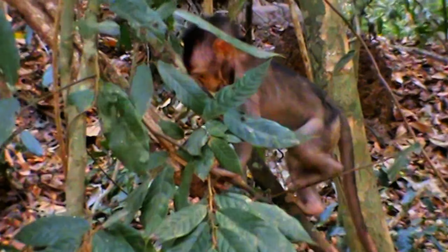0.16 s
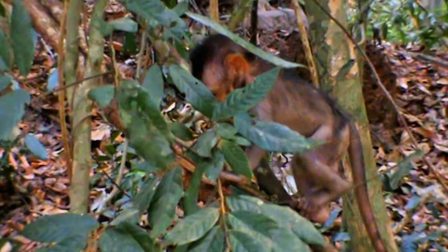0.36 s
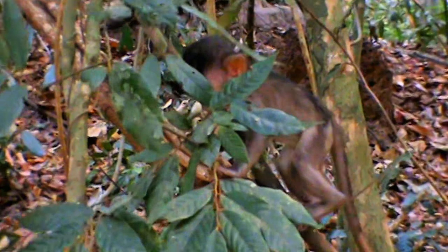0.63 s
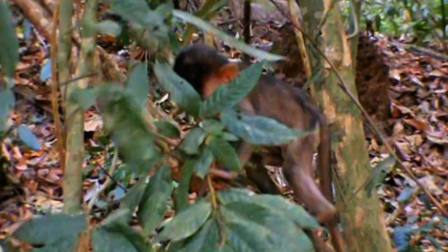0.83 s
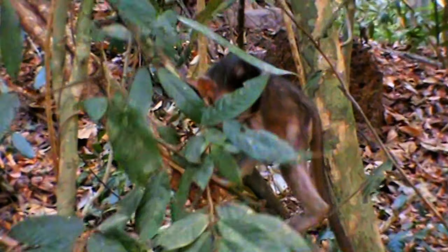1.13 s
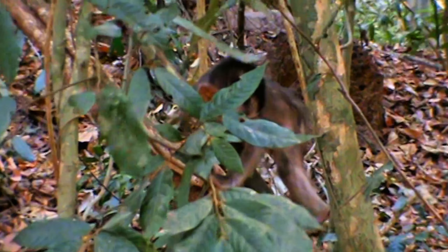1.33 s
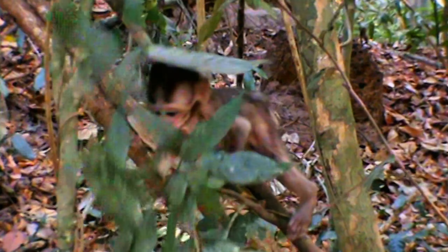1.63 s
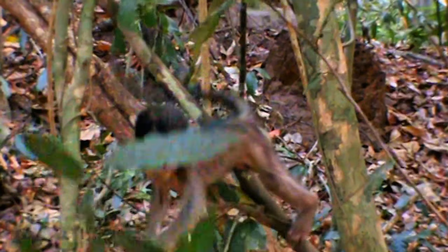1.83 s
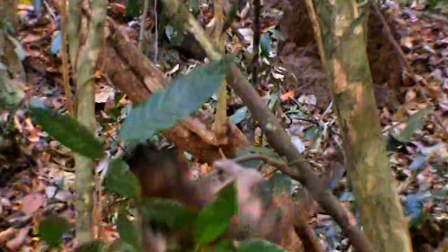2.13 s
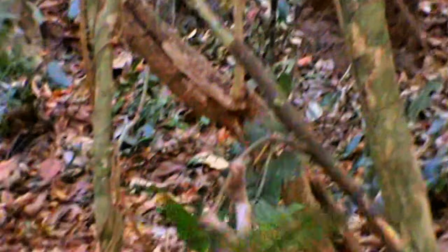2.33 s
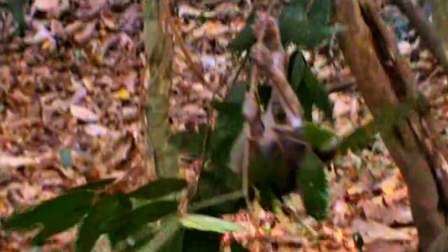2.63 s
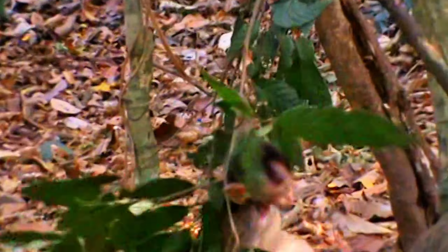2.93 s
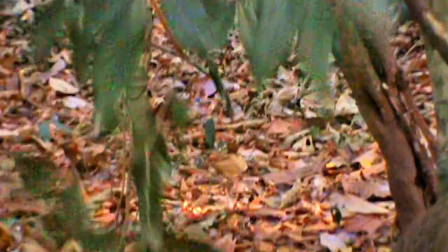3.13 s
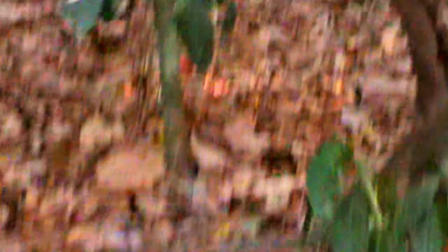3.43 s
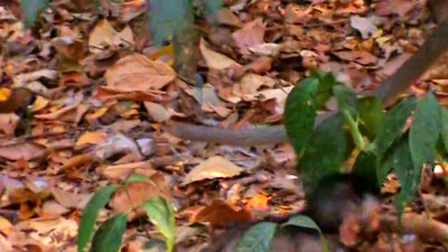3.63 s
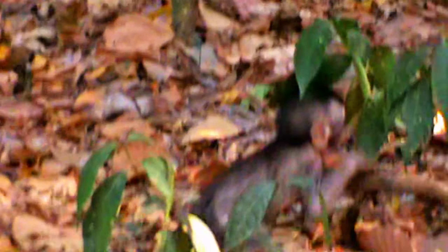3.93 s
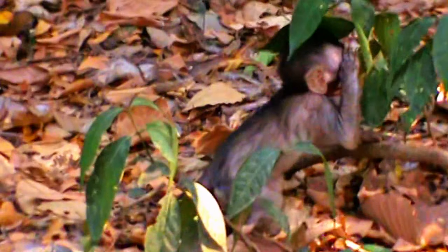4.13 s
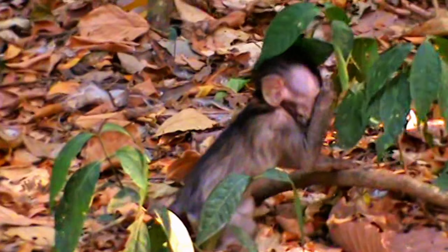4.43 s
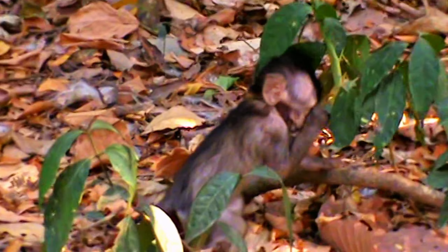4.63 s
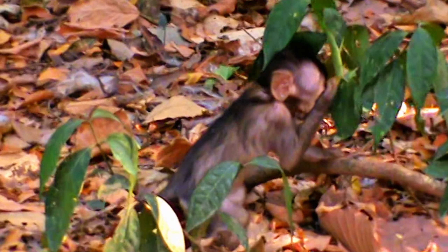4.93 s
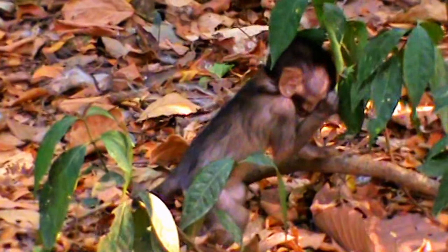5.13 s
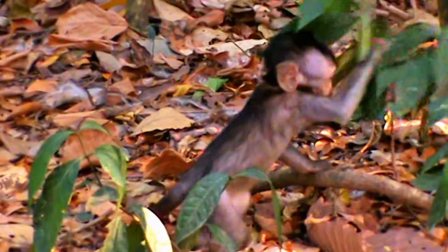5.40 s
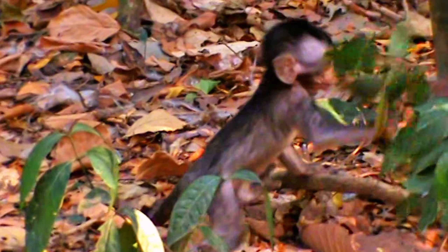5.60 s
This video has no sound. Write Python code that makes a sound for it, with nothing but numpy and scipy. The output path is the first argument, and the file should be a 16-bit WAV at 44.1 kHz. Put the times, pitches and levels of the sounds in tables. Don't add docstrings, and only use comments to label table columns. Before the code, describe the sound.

A dense, shrill cicada drone fills a tropical forest while nearer cicadas pulse rapidly and a small animal faintly bumps twigs.

```python
import sys
import numpy as np
from scipy import signal
from scipy.fft import rfft, irfft
from scipy.io import wavfile
from scipy.ndimage import uniform_filter1d, minimum_filter1d, map_coordinates

SR = 44100
rng = np.random.default_rng(int(sys.argv[2]) if len(sys.argv) > 2 else 0)


def store_pcm(level_fs):
    pcm = np.round(np.clip(level_fs, -1, 1) * 32767).astype(np.int16)
    wavfile.write(sys.argv[1], SR, np.atleast_2d(pcm).T)


def volts_from_decibels(level):
    exponent = np.asarray(level, float) / 20
    return 10 ** exponent


N = 254016
T = np.arange(N) / SR
HZ = np.maximum(np.fft.rfftfreq(N, 1 / SR), 1)


def rms_one(x):
    return x / np.sqrt(np.mean(x ** 2) + 1e-20)


def at_time(points, when):
    return np.interp(when, *np.transpose(points))


def at_hz(points):
    hz, value = np.transpose(points)
    return np.interp(np.log(HZ), np.log(np.maximum(hz, 1)), value)


def rings(modes):
    power = 0
    for hz, width, db in modes:
        distance = 2 * (HZ - hz) / width
        power = power + volts_from_decibels(db) ** 2 / (1 + distance ** 2) ** 2
    return power


def coloured(x, power):
    return rms_one(irfft(rfft(x) * np.sqrt(power), N))


def clicks(per_s, spread_db):
    sizes = volts_from_decibels(spread_db * np.minimum(rng.exponential(1, (2, N)), 4))
    signs = rng.choice([-1, 1], (2, N))
    return sizes * signs * (rng.random((2, N)) < per_s / SR)


def flicker(rate_hz):
    return coloured(rng.standard_normal(N), 1 / (1 + (HZ / rate_hz) ** 2) ** 2)


def heard(streams, power):
    # (f/Hz, likeness 0 to 1)
    likeness = [(30, .985), (99, 0.97), (160, 0.86), (270, 0.34), (450, 0.026), (740, 0.079), (1220, 0.93),
                (3330, 0.88), (6400, 0.9), (9000, 0.96), (10800, 0.62), (12700, 0.54), (14900, .72),
                (15400, .99)]
    # (f/Hz, phase/rad)
    lead = [(0, 0.41), (3620, -0.38), (4220, 0.011), (10100, -0.016), (10900, -0.3), (12400, 2),
            (13400, 1.2), (14600, 0.057), (16500, -0.1)]
    # (f/Hz, level/dB)
    tilt = [(100, -0.5), (300, -1), (3000, -0.3), (9500, -0.6), (11000, 0), (13000, 4), (15000, -2)]
    shared, differing = rfft(streams) * np.sqrt(power)
    alike = np.clip(at_hz(likeness), 0, .999)
    turn = volts_from_decibels(at_hz(tilt) / 2) * np.exp(.5j * at_hz(lead))
    mid = np.sqrt(1 + alike) * shared
    side = np.sqrt(1 - alike) * differing
    return rms_one(irfft([(mid + side) * turn, (mid - side) / turn], N))


def low_rumble():
    # (f/Hz, level per Hz/dB)
    floor_tone = [(15, -37), (25, -11), (50, -1.5), (100, -1), (200, -0.5), (260, 0.5), (350, -4.5),
                  (480, -2.5), (650, -4), (900, -4.5), (1150, -17), (1500, -28), (2300, -80)]
    floor_db = -59
    return volts_from_decibels(floor_db) * heard(rng.standard_normal((2, N)), volts_from_decibels(at_hz(floor_tone)) ** 2)


def motor_hum():
    # (f/Hz, width/Hz, level/dB)
    hum_pitches = [(101, 13, -69.5), (187, 14, -79), (244, 25, -77)]
    hum = np.zeros((2, N))
    for hz, width, db in hum_pitches:
        hum += volts_from_decibels(db) * heard(rng.standard_normal((2, N)), rings([(hz, width, 0)]))
    return hum


def twig_bumps():
    # (t/s, peak level/dB, f/Hz, time to fall 60 dB/s, crack level against the peak/dB)
    bumps = [(0.021, -51, 140, 0.15, -20), (.07, -50, 209, 0.071, -20), (.121, -45, 250, .03, -1),
             (.289, -54, 700, .02, -3), (.807, -53, 750, .02, 2), (1.646, -47, 380, 0.04, -6),
             (1.649, -43, 1050, .02, -9), (3.223, -44, 550, .02, -1), (3.245, -42, 815, .025, -3),
             (4.225, -46, 1000, .02, -4), (4.775, -39, 1100, 0.024, -9), (4.789, -35, 1060, 0.022, -26),
             (4.991, -46, 150, .03, -4), (5.169, -45, 520, .03, -9), (5.207, -39.5, 685, 0.015, -6),
             (5.66, -50, 496, 0.057, -16)]
    pan_db, rise_s, crack_t60_s = -4, .0012, 0.048
    sides = volts_from_decibels(np.array([[pan_db], [-pan_db]]) / 2)
    snap = coloured(rng.standard_normal(N), rings([(654, 1500, 0)]))
    out = np.zeros((2, N))
    for s, db, hz, t60, crack_db in bumps:
        after = np.maximum(T - s, 0)
        ring = np.sin(2 * np.pi * hz * after) * volts_from_decibels(db + 4 - 60 * after / t60)
        ring *= 1 - np.exp(-after / rise_s)
        crack = snap * (T > s) * volts_from_decibels(db + crack_db - 60 * after / crack_t60_s)
        out += (ring + crack) * sides
    return out


def leaf_brushes():
    # (start/s, end/s, level/dB, f/Hz)
    brushes = [
        (3.10, 3.28, -55.5, 700),
        (4.86, 4.95, -55.5, 750),
        (5.18, 5.32, -61, 700),
    ]
    out = np.zeros((2, N))
    for start, end, db, hz in brushes:
        stroke = np.sin(np.pi * np.clip((T - start) / (end - start), 0, 1)) ** .5
        grains = clicks(2500, spread_db=3.0)
        nearly_centred = grains[0] + 0.33 * grains
        out += volts_from_decibels(db) * stroke * coloured(nearly_centred, rings([(hz, 900, 0)]))
    return out


def monkey():
    return twig_bumps() + leaf_brushes()


def drone():
    # (f/Hz, width/Hz, level/dB)
    tymbal_rings = [(1550, 150, -20.5), (1764, 197, -6), (1985, 280, -17.5), (3427, 538, -1.5),
                    (3540, 64, -4), (3730, 600, -6), (4300, 370, -11), (5134, 440, -5.5), (5565, 240, -8.5),
                    (6000, 250, -14), (6790, 580, -11.5), (6860, 67, -23), (5220, 200, -12),
                    (8100, 170, -14.5), (14890, 250, -36), (7480, 510, -21), (7890, 770, -12.5),
                    (8500, 520, -18.5)]
    # (f/Hz, level per Hz/dB)
    rasp = [(900, -69), (1200, -40.5), (1450, -19), (2400, -25.5), (3000, -31.5), (4500, -13),
            (6500, -12.5), (9000, -15.5), (11000, -21), (12700, -22), (14000, -28), (15700, -27.5),
            (16500, -58)]
    # (t/s, pitch ratio)
    deep_pitch = [(0, 1.008), (2.002, 1.007), (3.502, 1.003), (5.76, 1.01)]
    # (t/s, level/dB)
    shrillness = [(0, 3), (.4, 2), (.8, 0), (1.2, 0), (2.4, 0), (3.6, -1.1), (4.8, 0.5), (5.2, 0.1),
                  (5.76, 2)]
    voice_db = [-28.5, -17.5, -22.5, -38.5]
    fade_db_per_s = [-0.12, -0.11, 0.018, 0.01]
    shrill_share = [0.13, -0.074, 0.28, .95]
    flicker_db = [.1, .1, .35, .7]

    power = rings(tymbal_rings) + volts_from_decibels(at_hz(rasp)) ** 2
    power = power / (1 + (1250 / HZ) ** 8)
    below = [0] + [1 / (1 + (HZ / edge) ** 16) for edge in (2500, 6300, 11500)] + [1]
    voices = []
    for lower, upper in zip(below, below[1:]):
        voices.append(heard(clicks(20000, spread_db=1.5), power * np.maximum(upper - lower, 0)))

    reading = np.cumsum(at_time(deep_pitch, T))
    voices[0] = np.array([map_coordinates(side, [reading], order=3, mode="grid-wrap") for side in voices[0]])

    shrill_db = at_time(shrillness, T)
    out = np.zeros((2, N))
    for db, fade_db, share, uneven_db, voice in zip(voice_db, fade_db_per_s, shrill_share, flicker_db, voices):
        out += volts_from_decibels(db + fade_db * T + share * shrill_db + uneven_db * flicker(22)) * voice
    return out


def throb(times, tops_db, voice, rise_s, fall_s):
    power = np.zeros(N)
    for s, db in zip(times, tops_db):
        after = T - s
        power += volts_from_decibels(db) ** 2 * np.exp(-(after / np.where(after < 0, rise_s, fall_s)) ** 2)
    return np.sqrt(power) * heard(clicks(5000, spread_db=5.5), rings(voice))


def answering_cicadas(beats):
    # (t/s, top level/dB)
    early_answers = [(.31, -27), (.46, -35), (.69, -39), (1.04, -30), (1.21, -30), (1.43, -23), (1.81, -26),
                     (1.93, -31), (2.08, -26), (2.25, -31), (2.42, -25), (3.02, -29), (3.17, -28),
                     (3.29, -33)]
    # (f/Hz, width/Hz, level/dB)
    answer_voice = [(4380, 830, 0)]
    lock_s, lag_s = 3.5, 0.093
    answer_db, accent_db, rise_db_per_s = -28, 1, -2
    late = beats[beats > lock_s] + lag_s
    late_db = answer_db + accent_db * (-1) ** np.arange(len(late)) + rise_db_per_s * (late - late.mean())
    early, early_db = np.transpose(early_answers)
    tops_db = np.append(early_db, late_db) - .3
    return throb(np.append(early, late), tops_db, answer_voice, rise_s=0.02, fall_s=0.027)


def throbbing_cicadas(beats):
    # (f/Hz, width/Hz,
    # level/dB)
    throb_voices = [
        [(8070, 200, 2), (8680, 580, -2), (7500, 400, -5.5)],
        [(7070, 240, -2), (6920, 930, -8)],
        [(12100, 770, 0), (13100, 450, 0), (13800, 600, 0), (14800, 500, -3), (15500, 600, -2)],
        [(10300, 600, -8), (9260, 540, 3), (10950, 500, 6)],
    ]
    # (t/s, effort/dB, fuller chorus joining the lone 8 kHz ring/dB)
    effort = [(.13, -13, 3), (.45, -3, -5), (.7, 0, 0.1), (.97, -6, 0), (1.2, -0.5, -4), (1.75, -8, 0.1),
              (2.2, -2, -2), (2.45, 2.5, 3), (2.7, -4, 1), (2.87, -8, 8), (3.36, 1, -1), (3.69, 2.5, 1.5),
              (4.0, 0.5, 0.1), (4.5, -1, 4), (4.85, -3.5, 5), (5.15, 0, 3), (5.45, -3, 3), (5.7, -5, -8)]
    throb_db = [-25.5, -28.5, -39.0, -38.0]
    effort_share = [0.67, 0.62, .8, .6]
    joining_share = [.03, 0.74, .95, .5]
    s, effort_db, joining_db = np.transpose(effort)
    effort_db = np.interp(beats, s, effort_db)
    joining_db = np.interp(beats, s, joining_db)
    uneven_db = .7 * rng.standard_normal((4, len(beats)))
    out = np.zeros((2, N))
    for db, a, b, chance_db, voice in zip(throb_db, effort_share, joining_share, uneven_db, throb_voices):
        tops_db = db + a * effort_db + b * joining_db + chance_db
        out += throb(beats, tops_db, voice, rise_s=0.018, fall_s=0.026)
    return out


def near_cicadas():
    # (start/s, beat/s, number of throbs)
    phrases = [
        (.15, .1385, 7),
        (1.105, .1265, 10),
        (2.37, .1645, 11),
        (4.18, .1505, 11),
    ]
    beats = np.concatenate([start + beat * np.arange(count) for start, beat, count in phrases])
    return throbbing_cicadas(beats) + answering_cicadas(beats)


def scene():
    return low_rumble() + motor_hum() + monkey() + drone() + near_cicadas()


def band_limit(x):
    return signal.sosfilt(signal.butter(12, 15740, fs=SR, output="sos"), x)


def record(dry):
    ceiling, fade_in_s = .52, .0004
    span = int(.004 * SR)
    peak = np.maximum(np.abs(dry).max(axis=0), 1e-9)
    gain = np.minimum(1, ceiling / peak) ** .5
    gain = minimum_filter1d(gain, size=span)
    gain = uniform_filter1d(uniform_filter1d(gain, size=span // 2), size=span // 2)
    opening = np.sin(np.pi / 2 * np.minimum(T / fade_in_s, 1)) ** 2
    return band_limit(dry * gain * opening)


dry = scene()
out = record(dry)
store_pcm(out)
```